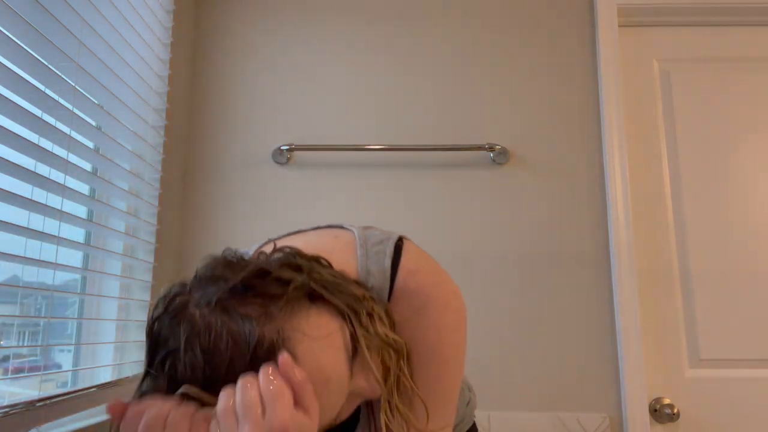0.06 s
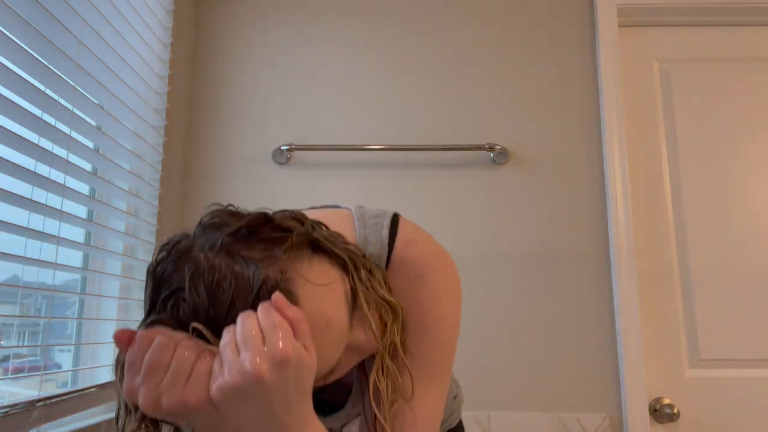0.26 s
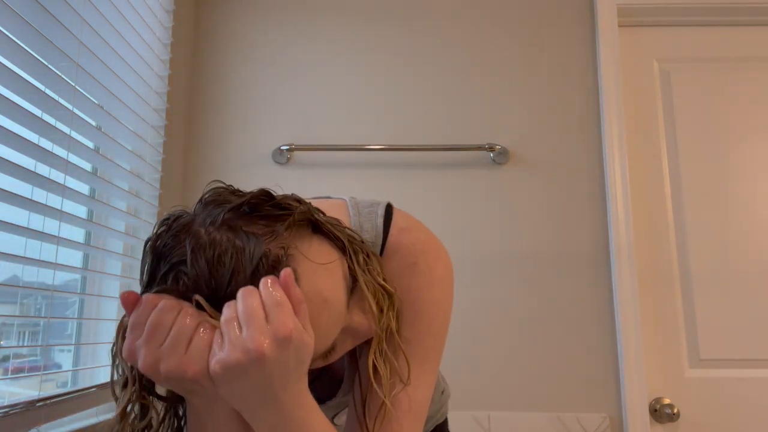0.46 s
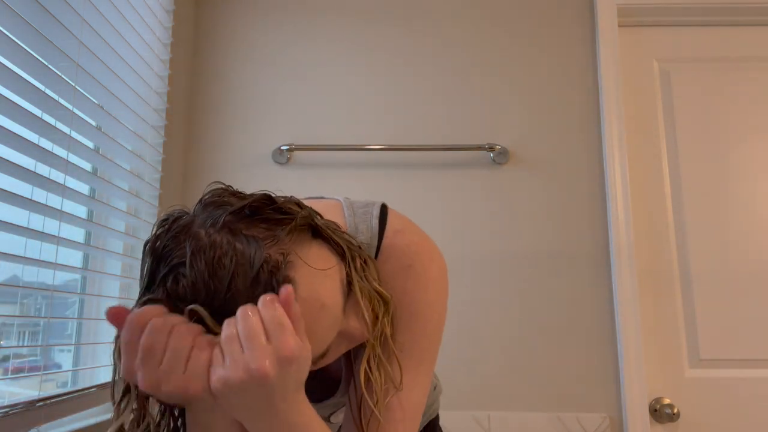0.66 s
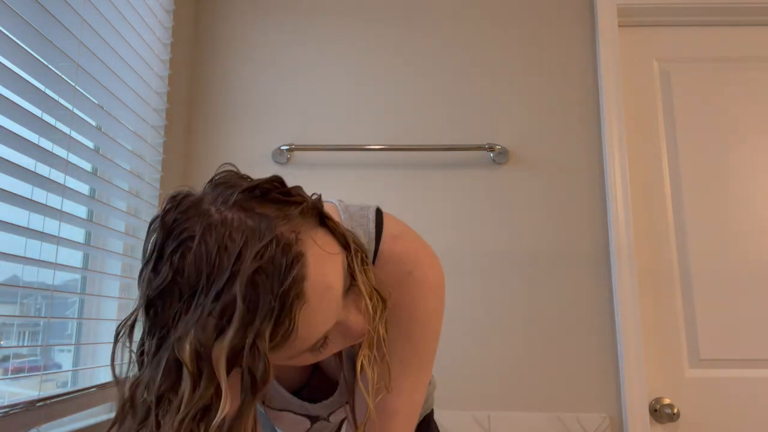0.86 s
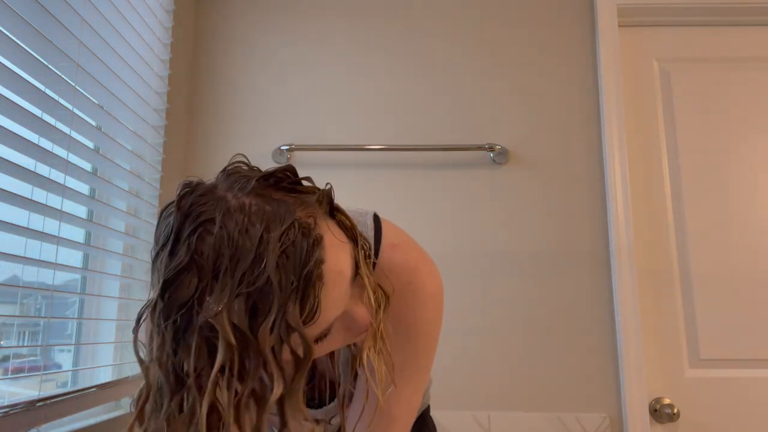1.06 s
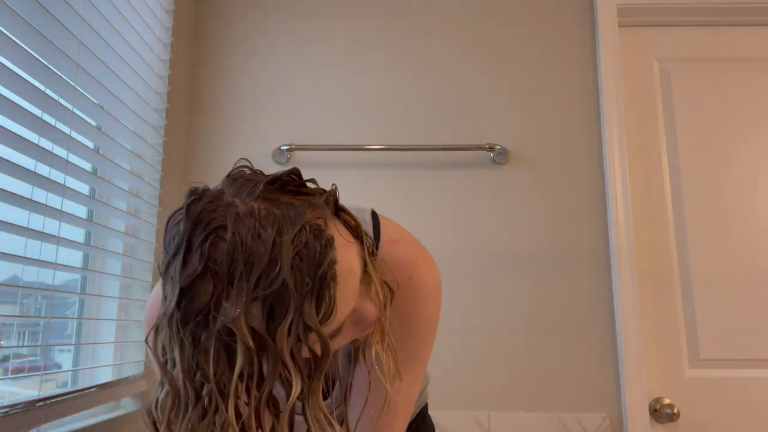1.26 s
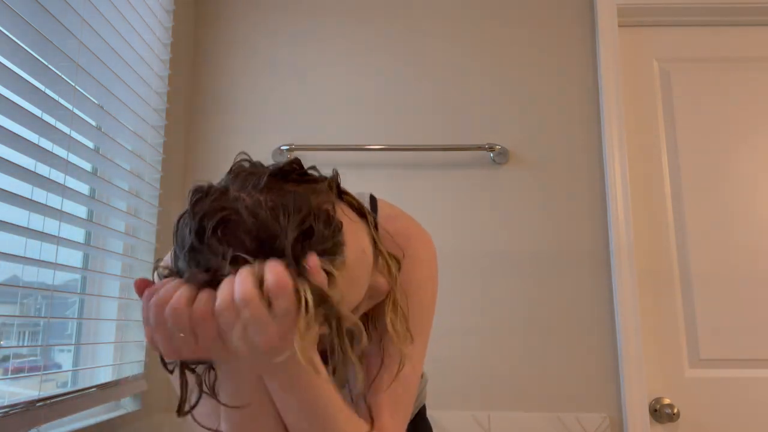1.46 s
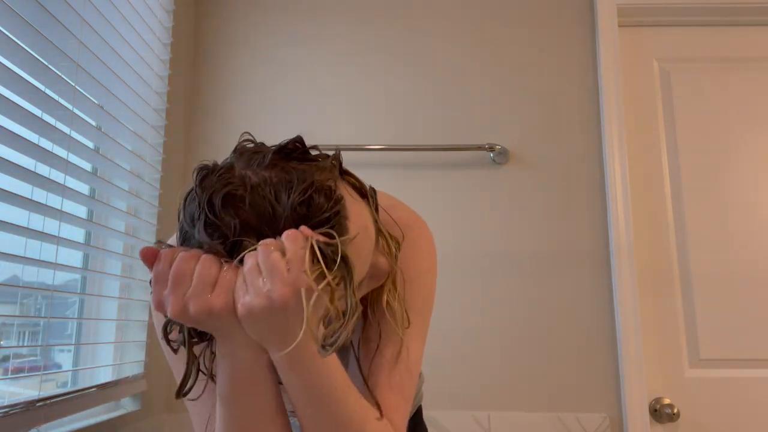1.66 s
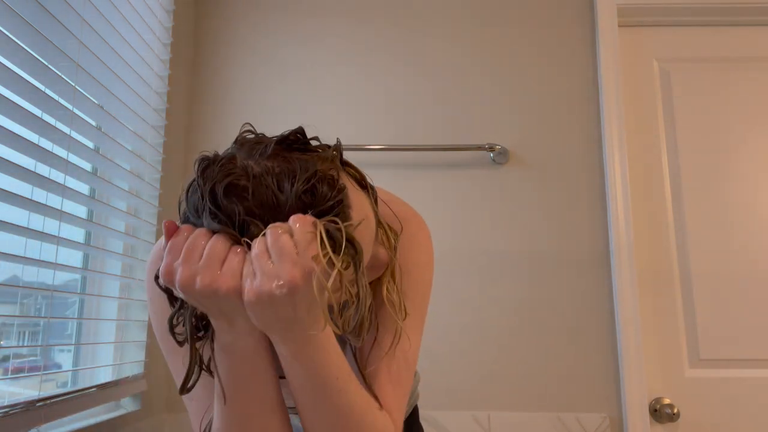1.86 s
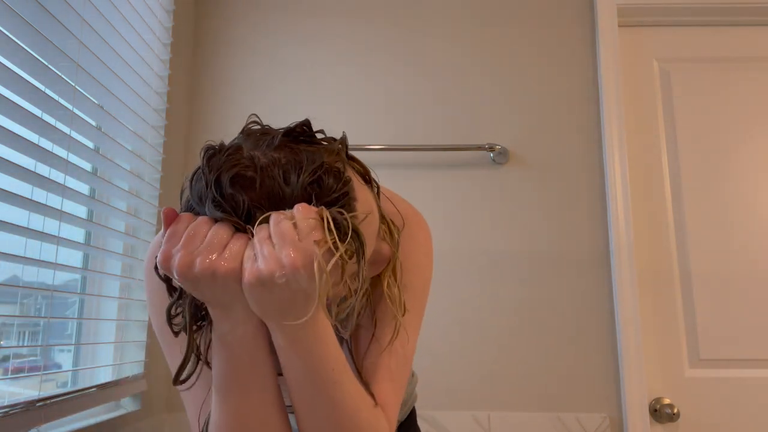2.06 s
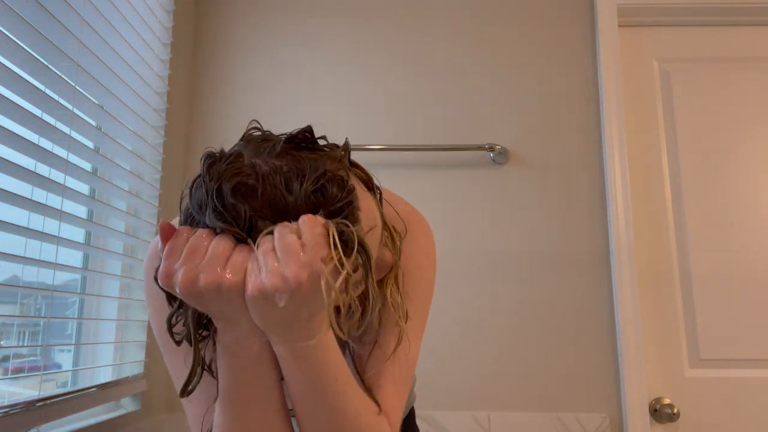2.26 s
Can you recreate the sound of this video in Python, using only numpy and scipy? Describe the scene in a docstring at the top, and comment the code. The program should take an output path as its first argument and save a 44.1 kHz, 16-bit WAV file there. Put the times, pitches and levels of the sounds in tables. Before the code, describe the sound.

Close, slightly left of centre, hands scrunch soaked hair; the first squeeze builds to a loud juicy squelch over a dull low rumble, then quiet, then a second, briefer squish with sparse clicks; short bathroom reverb.

```python
"""In a small, hard-walled bathroom two hands scrunch soaking wet hair twice.
Each squish is a swarm of filtered random impulses, bubbles bursting between the strands; in the first, wettest
squeeze gulps of air and water ring the hollow of the fists, over a low boom of two wavering sines.
Froth spurts through gaps as resonant fine pops, water films snap as short noise bursts, single bubbles
and drops ring as decaying sines. The hands rub as a noise rumble; a faint rush of air lies below."""
import sys
import numpy as np
from scipy import signal
from scipy.fft import rfft, irfft, next_fast_len
from scipy.io import wavfile
from scipy.ndimage import map_coordinates

SR = 44100
rng = np.random.default_rng(int(sys.argv[2]) if len(sys.argv) > 2 else 0)


def master(y):
    """Save y as 16-bit WAV."""
    cut = np.clip(np.atleast_2d(y).T, -1, 1)
    pcm = np.round(cut * 32767)  # scale
    wavfile.write(sys.argv[1], SR, pcm.astype(np.int16))


N = 101429

FIZZ_PER_S, SIZE_SPREAD_DB = 5500, 3
BUBBLE_RISE = 0.013  # share added over one t60: to the pitch of single bubbles, to the phase of pops


def amp(db):
    """Decibels to gain."""
    return 10 ** (np.asarray(db) / 20)


def unit(x):
    """x at rms 1."""
    return x / np.sqrt(np.mean(x ** 2) + 1e-20)


def along(points, hz):
    """Values at hz from (Hz, value) points on a log axis."""
    point_hz, values = np.transpose(points)
    return np.interp(np.log(hz + 1), np.log(point_hz + 1), values)


def level(rows):
    """A gain per sample from (s, dB) points."""
    times, levels_db = np.transpose(rows)
    return amp(np.interp(np.arange(N) / SR, times, levels_db))


def filtered(x, response):
    """x times a complex response of frequency."""
    size = next_fast_len(N + SR // 2)
    spectrum = rfft(x, size) * response(np.fft.rfftfreq(size, 1 / SR))
    return irfft(spectrum, size)[..., :N]


def coloured(x, points):
    """x through a causal, minimum-phase filter with the given (Hz, dB) shape."""
    size = 4096
    gains = amp(along(points, np.fft.rfftfreq(size, 1 / SR)))
    cepstrum = irfft(np.log(gains))
    # folding the cepstrum to positive times gives minimum phase
    cepstrum[1:size // 2] *= 2
    cepstrum[size // 2 + 1:] = 0
    impulse = irfft(np.exp(rfft(cepstrum)))
    return signal.fftconvolve(x, impulse[None], axes=1)[:, :N]


def low_cut(x, hz):
    """x with what lies below hz strongly weakened."""
    return signal.sosfilt(signal.butter(4, hz, "high", fs=SR, output="sos"), x)


def resonance(f, hz, width_hz):
    """Complex response of one damped mode."""
    return 1j * f * width_hz / (hz * hz - f * f + 1j * f * width_hz)


def wobble(knots_per_s, size):
    """A smooth random curve of size samples through normally distributed knots."""
    knots = rng.standard_normal(N // 20)
    return map_coordinates(knots, [np.arange(size) * knots_per_s / SR], mode="mirror")


def add(out, s, sound):
    """Mix a sound in at time s."""
    start = max(0, round(s * SR))
    part = out[:, start:][:, :sound.shape[-1]]
    part += sound[..., :part.shape[1]]


def swarm(per_s, spread_db):
    """Stereo impulses at random times, each of its own size, sign and direction."""
    chance, size_draw, sign_draw, side_draw = rng.random((4, N))
    size = amp(spread_db * np.minimum(-np.log(1 - size_draw), 4))
    impulses = size * np.sign(sign_draw - .5) * (chance < per_s / SR)
    angle = np.pi / 4 + (2 * side_draw - 1)  # radians
    return impulses * np.array([np.cos(angle), np.sin(angle)])


def pops():
    """Many small bubbles, each a damped, rising tone of its own pitch and size."""
    pops_per_s, centre_hz, spread_octaves, cycles_per_t60, low_hz = 410, 1814, .45, 30, 1030
    count = int(pops_per_s * N / SR)
    when, size, pitch_a, pitch_b = rng.random((count, 4)).T[:, :, None]
    # sqrt(6) scales the difference of two uniform draws to a standard deviation of 1
    hz = centre_hz * 2 ** (spread_octaves * np.sqrt(6) * (pitch_a - pitch_b))
    i = np.arange(SR // 50)
    cycles = hz * i / SR
    life = cycles / cycles_per_t60
    phase = 2 * np.pi * cycles * (1 + BUBBLE_RISE * np.minimum(life, 1))
    rings = amp(13 * size - 60 * life) * np.sin(phase)
    places = (when * N).astype(int) + i
    cloud = np.bincount(places.ravel(), rings.ravel(), N)[:N]
    return unit(low_cut(cloud, low_hz))


def squishes():
    """Each squish bursts clumps of coarse bubbles (crackle) and fine ones (fizz); longer ones swell more slowly."""
    # Each row: start in seconds, length in seconds, crackle level in dB, fizz level in dB.
    squish_rows = [(-0.001, 0.026, -73, -54), (0.046, 0.025, -63.5, -45), (0.074, 0.0097, -52.5, -35.5),
                   (0.105, 0.088, -59, -41), (0.201, 0.025, -36.5, -33.5), (0.235, 0.036, -39.5, -33),
                   (0.278, 0.067, -36.5, -32.5), (0.354, 0.055, -35.5, -36), (0.414, 0.02, -29.5, -36),
                   (0.426, 0.035, -28.5, -34), (0.466, 0.028, -35.5, -33.5), (0.515, .03, -36, -42),
                   (0.538, 0.028, -34.5, -46), (0.604, 0.0082, -47, -38), (0.641, 0.043, -47.5, -52),
                   (1.141, 0.035, -74, -64), (1.26, 0.034, -83, -85.5), (1.306, 0.016, -95.5, -61.5),
                   (1.416, .012, -87, -76), (1.466, 0.056, -96, -73.5), (1.522, 0.005, -39, -48),
                   (1.538, 0.022, -25.5, -33), (1.566, 0.039, -40, -41), (1.632, 0.063, -45, -49),
                   (1.681, 0.028, -44, -44), (1.694, 0.0183, -37, -42), (1.775, 0.044, -53.5, -54.5),
                   (1.793, 0.00466, -39, -52), (1.824, 0.035, -43, -47.5), (1.924, 0.034, -52, -64),
                   (1.97, 0.008, -55.5, -57.5), (1.973, 0.016, -36, -43.5), (1.986, 0.049, -51.5, -38.5),
                   (2.04, 0.041, -71, -47)]
    # Spectra of coarse and fine bubbles. Each row: frequency in Hz, gain in dB.
    crackle_colour = [(250, -53.5), (550, -27.5), (820, -20), (1100, -5), (1600, -1), (2300, 1),
                      (3200, -4.5), (5000, -6.5), (9000, -45)]
    fizz_colour = [(900, -37), (2200, -0.5), (3500, 3), (5000, -2), (6500, 3.5), (7900, 5), (9200, -17),
                   (10200, 1), (12700, -5.5), (14200, -25.5), (15800, -20.5)]
    crackle_per_s, clumps_per_s = 1600, 170
    attack_s, attack_share, release_s = 0.0054, 0.22, 0.021  # share of the length; release to 1/e
    pop_db, crackle_clump_db, fizz_clump_db = -4, 3.4, 2.6  # pops relative to crackle; dB per unit of wobble

    t, gains = np.arange(N) / SR, np.zeros((2, N))
    for s, length_s, crackle_db, fizz_db in squish_rows:
        rise = np.clip((t - s) / (attack_s + attack_share * length_s), 0, 1)
        shape = rise * np.exp(-np.maximum(t - s - length_s, 0) / release_s)
        gains = np.maximum(gains, amp([[crackle_db], [fizz_db]]) * shape)
    crackle = unit(coloured(swarm(crackle_per_s, SIZE_SPREAD_DB), crackle_colour))
    fizz = unit(coloured(swarm(FIZZ_PER_S, SIZE_SPREAD_DB), fizz_colour))
    crackle = (crackle + amp(pop_db) * pops()) * amp(crackle_clump_db * wobble(clumps_per_s, N))
    fizz = fizz * amp(fizz_clump_db * wobble(clumps_per_s, N))
    return gains[0] * unit(crackle) + gains[1] * unit(fizz)


def squelch():
    """Irregular gulps of air and water ring the hollow of the fists."""
    # Flow through the fists. Each row: time in seconds, level in dB.
    flow = [(0, -85.5), (.06, -71), (.09, -54), (.17, -56), (.22, -46), (.3, -58.5), (.34, -39),
            (.365, -34.5), (.378, -26), (.41, -33), (.44, -27.5), (.462, -32), (.49, -33.5), (.52, -31.5),
            (.562, -39.5), (.58, -61), (.66, -80)]
    # Modes of the hollow. Each row: frequency in Hz, width in Hz, gain in dB.
    modes = [(275, 50, -11), (368.5, 25, -2), (429.4, 10, -1), (590, 72, 3.5), (770, 130, -3.5),
             (1080, 180, 0.5), (1190, 70, -5)]
    gulps_per_s, low_hz = 700, 211

    def hollow(f):
        """Sum of the modes with alternating signs."""
        return sum((-1) ** k * amp(db) * resonance(f, hz, width_hz) for k, (hz, width_hz, db) in enumerate(modes))

    gulps = low_cut(swarm(gulps_per_s, spread_db=2.0).mean(0), low_hz)
    return level(flow) * unit(filtered(gulps, hollow))


def rub():
    """The hands press and slide with a soft, dull rumble: low noise, stronger at the left."""
    # Each row: time in seconds, level in dB.
    rub_level = [(0, -93), (.07, -61), (.13, -46.5), (.16, -48), (.2, -45.5), (.24, -50.5), (.275, -45.5),
                 (.305, -61), (.34, -47), (.37, -43.5), (.46, -38.5), (.54, -53), (.575, -61.5), (.7, -76),
                 (.76, -56.5), (.8, -86.5), (1.52, -90.5), (1.56, -57), (1.66, -65.5), (1.75, -100)]
    # Spectrum. Each row: frequency in Hz, gain in dB.
    rumble_colour = [(25, -31), (55, -14.5), (78, -14), (108, -1), (160, -2.5), (230, -4.5), (400, -20.5),
                     (1000, -55.5)]
    rumble = unit(coloured(rng.standard_normal((1, N)), rumble_colour))
    return level(rub_level) * rumble * amp([[1.5], [-1.5]])


def room_tone():
    """A faint low rush of air: noise mostly alike in both ears."""
    # Spectrum. Each row: frequency in Hz, gain in dB.
    air_colour = [(15, -63), (25, -44), (115, -6.5), (152, 3.5), (190, -8.5), (231, -7.5), (293, 1.5),
                  (769, -11.5), (1090, -13.5), (1390, -26.5), (1720, -19), (3010, -32), (7480, -41),
                  (9770, -42), (15000, -46)]
    # Each row: time in seconds, level in dB.
    air_level = [(0, -60), (.8, -61.5), (1.05, -70.5), (1.25, -63.5), (1.6, -61), (2.3, -62.5)]
    air = rng.standard_normal(N) + 0.89 * rng.standard_normal((2, N))
    return level(air_level) * unit(coloured(air, air_colour))


def bubbles():
    """Each bubble or drop rings briefly; its pitch rises and flutters as the strands deform it."""
    # Each row: start in seconds, pitch in Hz, level in dB ahead of attack and decay, t60 in seconds.
    bubble_rows = [(0.017, 2554, -35, 0.027), (.052, 2060, -31, 0.021), (.065, 2084, -24, 0.017),
                   (.09, 2030, -26, 0.017), (0.254, 1057, -17, 0.033), (0.276, 1730, -14.5, 0.0082),
                   (0.289, 1021, -18, 0.087), (0.309, 1700, -13, 0.021), (0.353, 1014, -17, 0.036),
                   (0.369, 1167, -17.5, 0.059), (.375, 626, -17, 0.053), (0.379, 1003, -12, 0.03),
                   (0.394, 1022, -16.5, 0.055), (.413, 1102, -13.5, .025), (.437, 617, -11.5, 0.04),
                   (0.452, 2600, -13, 0.014), (.46, 880, -13.5, 0.034), (.542, 1110, -23, 0.04),
                   (0.551, 1028, -18.5, 0.023), (.669, 1992, -28, 0.029), (0.836, 1232, -41, 0.025),
                   (.848, 682, -42, 0.11), (0.85, 1067, -40, 0.04), (0.857, 1372, -49, 0.027),
                   (.868, 910, -47, 0.052), (.875, 707, -41, 0.033), (0.885, 3110, -46, 0.035),
                   (0.933, 3670, -56.5, 0.029), (1.316, 4030, -47.5, 0.09), (1.375, 3930, -59, 0.043),
                   (1.466, 5040, -54.5, 0.021), (1.532, 1390, -27, 0.018), (1.55, 958, -14, 0.012),
                   (1.558, 973, -20.5, 0.017), (1.705, 1160, -25, 0.015), (1.802, 2130, -16.5, 0.0094),
                   (1.804, 2900, -12, 0.0056), (1.808, 1167, -46, 0.052), (1.983, 970, -39, 0.044),
                   (2.022, 1246, -36, 0.052)]
    attack_s, flutter_hz_at_1khz, flutters_per_s = 0.0022, 75, 420
    out, t = np.zeros((2, N)), np.arange(SR // 5) / SR
    for s, hz, db, t60_s in bubble_rows:
        flutter_hz = flutter_hz_at_1khz * np.sqrt(hz / 1000) * wobble(flutters_per_s, len(t))
        pitch_hz = hz * (1 + BUBBLE_RISE * np.minimum(t / t60_s, 1)) + flutter_hz
        envelope = amp(db - 60 * t / t60_s) * (1 - np.exp(-t / attack_s))
        add(out, s, envelope * np.sin(2 * np.pi * np.cumsum(pitch_hz) / SR))
    return out


def spurts():
    """Froth spurts through a gap between the strands: fine pops that ring at the gap's own pitch."""
    # Each row: start in seconds, length in seconds, pitch in Hz, level in dB ahead of the envelope.
    spurt_rows = [(.05, 0.067, 2030, -46.5), (0.065, .03, 2720, -43.5), (0.08, 0.037, 4000, -39.5),
                  (0.272, 0.032, 1900, -35.5), (0.46, .07, 2400, -37), (0.557, 0.073, 2690, -40),
                  (0.663, 0.026, 2010, -43.5), (0.836, 0.062, 1300, -56.5), (.845, 0.04, 800, -58),
                  (.878, 0.024, 3200, -63.5), (1.15, 0.062, 3300, -69.5), (1.15, 0.069, 5400, -68.5),
                  (1.316, 0.029, 4200, -66), (1.311, 0.023, 7550, -60.5), (1.539, 0.034, 620, -45.5),
                  (1.593, .05, 1680, -40.5), (1.696, 0.042, 5560, -39), (1.703, 0.02, 1106, -44),
                  (1.764, 0.029, 2010, -45.5), (1.773, 0.059, 6470, -47), (1.832, 0.043, 2420, -49.5),
                  (1.839, 0.034, 7600, -44.5), (1.941, 0.042, 1200, -52.5), (2.017, 0.046, 1830, -43)]
    out = np.zeros((2, N))
    for s, length_s, hz, db in spurt_rows:
        size = int(length_s * SR)
        gap = signal.iirpeak(hz, 4.7, fs=SR)  # Q 4.7, passed twice
        froth = swarm(FIZZ_PER_S, SIZE_SPREAD_DB)[:, :size]
        ring = signal.lfilter(*gap, signal.lfilter(*gap, froth))
        envelope = np.sin(np.pi * np.sqrt(np.arange(size) / size))
        add(out, s, amp(db) * unit(ring) * envelope)
    return out


def snaps():
    """Films of water tear with a bright spit and a duller smack, both decaying noise bursts."""
    # Each row: start in seconds, bright spit in dB, dull smack in dB, both ahead of the colour filters.
    snap_rows = [(.248, -21, -24.5), (.276, -39, -18.5), (0.308, -32.5, -18), (0.436, -12, -14.5),
                 (0.4372, -8, -24.5), (0.4449, -9, -26.5), (.4535, -31.5, -14.5), (0.464, -25.5, -15.5),
                 (0.488, -27, -22), (.551, -44.5, -23.5), (.563, -33.5, -23.5), (0.61, -34, -35),
                 (1.531, -37.5, -22), (1.55, -27, -18), (1.556, -30.5, -19.5), (1.564, -26, -24),
                 (1.707, -39, -32), (1.802, -69, -36), (1.834, -57, -28.5), (1.99, -36, -30)]
    # Spectra of spit and smack. Each row: frequency in Hz, gain in dB.
    spit_colour = [(500, -16.5), (2000, -10), (5000, -10), (6300, 4.5), (7700, 4), (9200, -18.5),
                   (11500, 4), (13500, -5), (15800, -26.5)]
    smack_colour = [(300, -29), (800, -11), (1500, 1.5), (2600, 8.5), (4000, -4.5), (8000, -19),
                    (15000, -36.5)]
    t60_s = 0.0079
    spit, smack, t = np.zeros((2, N)), np.zeros((2, N)), np.arange(SR // 30) / SR
    for s, spit_db, smack_db in snap_rows:
        add(spit, s, amp(spit_db - 60 * t / t60_s) * rng.standard_normal(len(t)))
        add(smack, s, amp(smack_db - 60 * t / t60_s) * rng.standard_normal(len(t)))
    return coloured(spit, spit_colour) + coloured(smack, smack_colour)


def boom():
    """Two low resonances, likely of the narrow room, waver while the squeeze is hardest."""
    # Each row: time in seconds, lower resonance in dB, upper resonance in dB.
    boom_rows = [(.33, -66.5, -73.5), (.362, -60, -46.5), (0.379, -50.5, -29), (.403, -43, -29),
                 (.425, -42, -39), (.445, -39.5, -38.5), (.464, -36.5, -28), (.5, -41, -38.5),
                 (.538, -39.5, -45), (.57, -68, -49), (.62, -89.5, -81)]
    waver_hz, wavers_per_s, flutter_db = 2.5, 45, -1  # Hz and dB per unit of wobble
    times, *levels = np.transpose(boom_rows)
    out = np.zeros(N)
    for hz, db in zip([108, 215], levels):
        pitch_hz = hz + waver_hz * wobble(wavers_per_s, N)
        gain = level(np.column_stack([times, db])) * amp(flutter_db * wobble(wavers_per_s, N))
        out += gain * np.sin(2 * np.pi * np.cumsum(pitch_hz) / SR)
    sounding = np.arange(N) / SR < times[-1]
    return out * sounding * amp([[1.8], [-1.8]])


def bathroom(x, room_db):
    """Direct sound, near walls and a bright tail that differs at each ear."""
    # Decay of the tail. Each row: frequency in Hz, t60 in seconds.
    room_t60 = [(100, 0.29), (400, 0.23), (1500, 0.27), (4000, 0.21), (8000, 0.21), (14000, 0.11)]
    tail_db, direct_db, walls_db = -6, -3, -4  # room_db is added to tail and walls
    ear_lag_s = .00003  # the left ear hears the hands first

    hz, t, noise = signal.stft(rng.standard_normal((2, SR * 3 // 4)), SR, nperseg=256)
    decay = amp(-60 * t / along(room_t60, hz)[:, None])
    tail = signal.istft(noise * decay, SR, nperseg=256)[1]
    t = np.arange(tail.shape[1]) / SR
    tail *= np.clip(t / 0.0097, 0, 1)
    # sparse reflections after 2 ms
    walls = rng.standard_normal(tail.shape) * (rng.random(tail.shape) < .1)
    walls = walls * (t > .002) * np.exp(-t / 0.0071)
    answer = (amp(tail_db) * unit(tail) + amp(walls_db) * unit(walls)) / np.sqrt(len(t))
    direct = filtered(x, lambda f: np.exp(1j * np.pi * f * ear_lag_s * [[1], [-1]]))
    return amp(direct_db) * direct + amp(room_db) * signal.fftconvolve(x, answer, axes=1)[:, :N]


def scene():
    """The hands work a little left of centre."""
    swarms = bathroom(squishes() + spurts() + squelch(), room_db=-.5)
    rings = bathroom(bubbles() + snaps(), room_db=-1.5)
    left_right = amp([[2.1], [0.4]])
    return (swarms + rings) * left_right + rub() + boom() + room_tone()


def record(dry):
    """Nothing is kept above the band limit."""
    top_hz = 15900
    return filtered(dry, lambda hz: hz < top_hz)


dry = scene()
out = record(dry)
master(out)
```